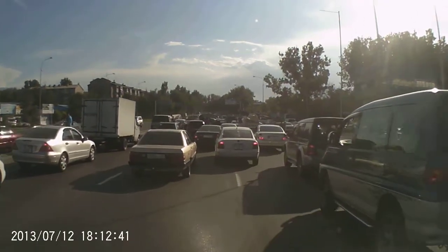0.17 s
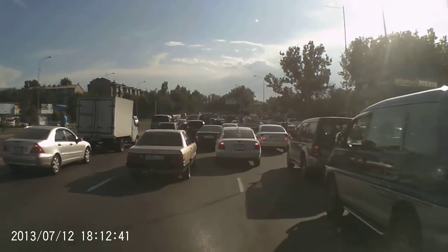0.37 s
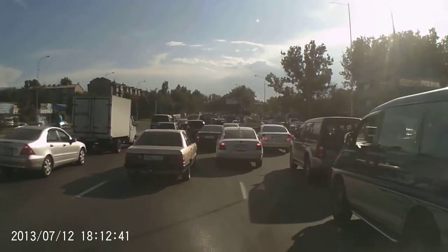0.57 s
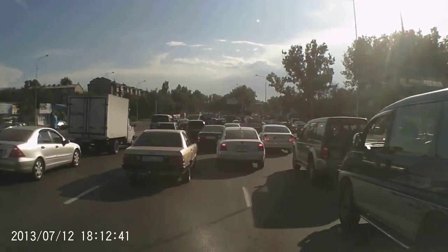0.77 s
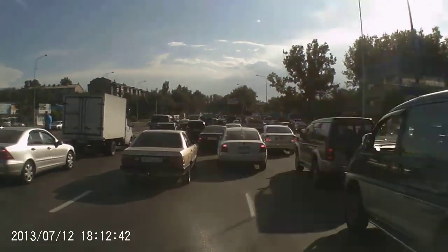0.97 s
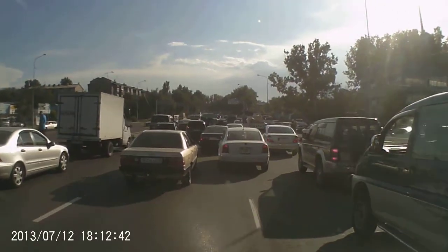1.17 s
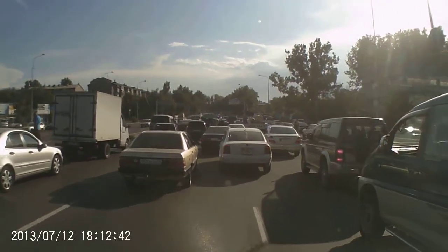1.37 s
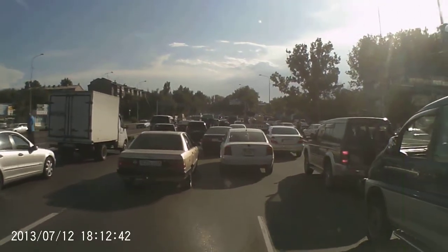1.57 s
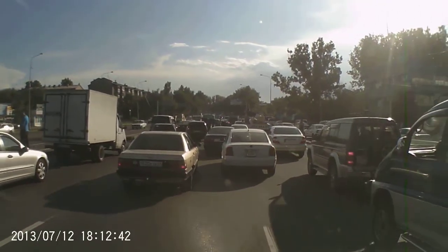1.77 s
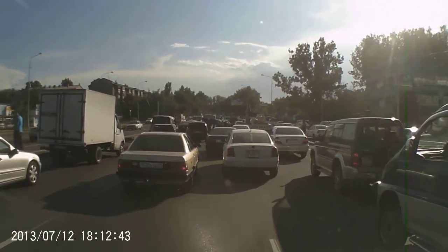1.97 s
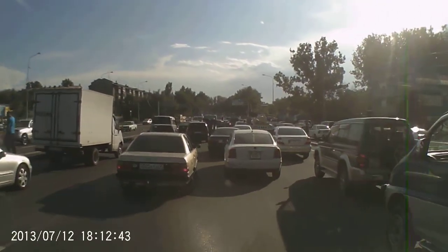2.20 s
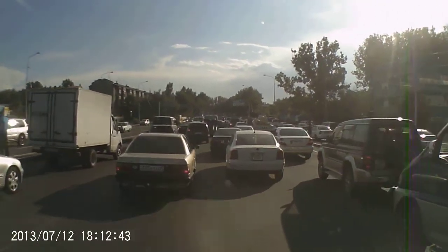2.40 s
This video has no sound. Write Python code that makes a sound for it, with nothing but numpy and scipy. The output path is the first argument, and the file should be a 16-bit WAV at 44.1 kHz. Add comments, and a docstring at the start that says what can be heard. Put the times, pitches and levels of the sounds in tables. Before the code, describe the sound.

Low car-cabin rumble with a slowing engine hum, dull body bumps and faint buzzy electronic hiss

```python
"""The cabin of a car rolling slowly in heavy traffic booms: deep noise held at an even strength.
The engine adds a slowing hum built from sine waves, and bumps thud as short swelling tones.
Road rumble, tyre roar and upper tyre hiss are coloured noise; a panel growls briefly twice.
A dashboard camera's electronics add hiss, buzzy spurts, thin whines, a sizzle, ticks and crackle."""
import sys
import numpy as np
from scipy import signal
from scipy.fft import irfft
from scipy.io import wavfile
from scipy.ndimage import uniform_filter1d

SR = 44100
rng = np.random.default_rng(int(sys.argv[2]) if len(sys.argv) > 2 else 0)


def dump(signal):
    """Clip the signal to [-1, 1] and save it as 16-bit WAV at the path in sys.argv[1]."""
    limited = np.clip(np.atleast_2d(signal).T, -1, 1)
    pcm = np.round(limited * 32767).astype(np.int16)
    wavfile.write(sys.argv[1], SR, pcm)


N = 112014  # length in samples

# Noise colours below give only the balance of pitches; strength is set separately.

# Camera hiss colour: (frequency [Hz], relative level [dB per Hz])
HISS_COLOUR = [(1000, -4), (3000, 0), (4000, 0), (4400, -3), (5350, 0), (5900, -3), (7000, -4),
               (7500, -7.5), (8100, -6), (9700, -12.5), (10800, -12.5), (12200, -9), (13200, -10.5),
               (13800, -16), (15000, -16.5), (15600, -20)]
# Hiss resonances: (centre [Hz], width [Hz], lift [dB])
HISS_RESONANCES = [(5380, 250, 2), (8000, 200, 2), (11100, 250, 2.5), (12050, 220, 3)]
HISS_DB, HISS_BUZZ_DB = -54.5, 1.4  # middle level, and swing up and down at the buzz rate
BUZZ_HZ, BUZZ_DEPTH = 64, .16  # buzz rate; relative depth of the buzz in the spurts
REPEAT_SHARE, REPEAT_ABOVE_HZ = .33, 7500  # echoed share of the treble, and where it begins

# Interference spurts: (start [s], length [s], level against SPURT_DB [dB], treble change [dB])
SPURT_EVENTS = [(0.106, 0.05, -1.5, 1), (0.29, 0.046, -6, 4), (0.349, 0.05, -1.5, -8),
                (0.409, 0.089, 0.5, -7), (0.569, 0.043, -2.5, -3), (0.703, 0.033, -6, -14),
                (0.78, 0.065, -1.5, -1), (.915, 0.042, -4.5, 4), (1.114, 0.055, 1, 0.5),
                (1.32, 0.054, -4, 2), (1.402, .098, -2.5, 0.5), (1.582, 0.041, 0.5, -1),
                (1.781, 0.039, -3, 2), (1.904, 0.0464, -4, 3.5), (1.979, .028, -8, 0), (2.11, .045, -2, 2),
                (2.185, .04, -8, -3), (2.25, 0.04, -3, 1), (2.304, 0.051, -3, 4), (2.413, .08, -0.2, .3)]
# Spurt colour: (frequency [Hz], relative level [dB per Hz])
SPURT_COLOUR = [(1000, -5), (3000, -2), (4400, -6), (5300, 0), (6000, -1), (6800, -1), (7500, -7),
                (8700, -11), (9300, -7), (10800, -12), (12600, -10), (13100, -7), (13700, -14),
                (15600, -17)]
# Spurt resonances: (centre [Hz], width [Hz], lift [dB])
SPURT_RESONANCES = [(6980, 180, 5), (8000, 150, 8), (10420, 180, 8.5), (11250, 260, 4), (12050, 140, 13.5),
                    (13050, 220, 2)]
SPURT_DB, SPURT_REST_DB = -53.2, -26  # base level, and constant fizz relative to it
SPURT_EDGE_S = .005  # ramp time, also used by the whines
BRIGHT_ABOVE_HZ = 8500  # where each spurt's treble change begins
# Pulse rate, relative rate drift, decay time, and height above the steady fizz
PULSE_HZ, PULSE_JITTER, PULSE_DECAY_S, PULSE_HEIGHT = 215, .2, .0004, 1.9

# Thin whines before wavering: (start [s], length [s], frequency [Hz], level [dB])
WHINE_EVENTS = [(-.01, .128, 8909, -62.5), (.135, .045, 8909, -64), (.56, .13, 7187, -71),
                (.965, .09, 8995, -73), (.965, .22, 10900, -76), (1.07, .115, 8995, -68),
                (1.27, .04, 8995, -72)]
# High sizzle colour: (frequency [Hz], relative level [dB per Hz])
SIZZLE_COLOUR = [(3500, -35), (5000, -15), (5400, 0), (5750, -9), (6500, -28)]
# Sizzle strength before drift: (time [s], level [dB])
SIZZLE_STRENGTH = [(0, -70), (1.3, -83), (1.8, -71), (1.86, -61), (1.92, -72), (2.05, -67), (2.54, -73)]
# Tiny ticks: (middle [s], level [dB])
TICK_EVENTS = [(.419, -48), (.439, -48), (.5115, -44), (1.177, -41.5), (1.912, -48)]
TICK_S = .0004  # fade time on each side
CRACKLE_PER_S, CRACKLE_DB = 150, -54

# Upper tyre hiss colour: (frequency [Hz], relative level [dB per Hz])
TYRE_HISS_COLOUR = [(400, 1), (850, -12.5), (1100, -2), (1550, -0.5), (1680, -6), (1900, -6.5), (2300, -15),
                    (3000, -15.5)]
# Tyre hiss strength before gain and drift: (time [s], level [dB])
TYRE_HISS_STRENGTH = [(0, -45.5), (.3, -43.5), (1.08, -43.5), (1.15, -41), (1.2, -45), (1.45, -43.5),
                      (1.6, -46), (2.22, -44.5), (2.27, -39.5), (2.31, -44), (2.35, -40.5), (2.42, -45),
                      (2.455, -40), (2.54, -46.5)]
# Tyre roar colour: (frequency [Hz], relative level [dB per Hz])
TYRE_COLOUR = [(150, -0.5), (400, -3.5), (650, -2.5), (900, -4), (1100, -10), (1500, -11)]
# Tyre roar strength before gain and drift: (time [s], level [dB])
TYRE_STRENGTH = [(0, -38), (.06, -43), (.11, -38.5), (.18, -42), (.9, -43), (.97, -40), (1.06, -41.5),
                 (1.13, -37.5), (1.21, -43.5), (1.5, -45), (1.76, -45), (1.89, -45), (2, -46), (2.27, -42),
                 (2.54, -43)]
TYRE_GAIN_DB, TYRE_HISS_GAIN_DB = 2, -.5
# Road rumble colour: (frequency [Hz], relative level [dB per Hz])
ROAD_COLOUR = [(40, -18), (75, -8.5), (110, -1), (140, -1), (170, -7), (220, -7), (300, -12.5), (400, -17),
               (800, -22), (2000, -99)]
# Rumble strength before drift: (time [s], level [dB])
ROAD_STRENGTH = [(0, -38), (.14, -37), (.21, -45), (.28, -34.5), (.35, -35.5), (.5, -38), (.72, -35),
                 (.98, -41.5), (1.08, -35.5), (1.2, -37), (1.4, -39.5), (1.55, -38.5), (1.75, -38.5),
                 (1.85, -35), (2.03, -38.5), (2.2, -40.5), (2.54, -42)]
# Cabin resonances: (centre [Hz], width [Hz], lift [dB])
CABIN_RESONANCES = [(292, 27, 3), (452, 16, 4.5), (537, 52, 3.5), (702.7, 21, 5.5), (926, 31, 3.5),
                    (1091, 41, 6.5), (1284, 160, 2.5), (1545, 58, 4), (1640, 30, 3), (1752, 44, 5.5),
                    (1940, 42, 3.5)]

# Panel growls before drift: (middle [s], frequency [Hz], level [dB], half length [s])
PANEL_DRONES = [(1.492, 166.6, -27.5, 0.025), (2.362, 163.9, -34, 0.036)]
# Body bumps before bass evening: (start [s], ring frequency [Hz], level [dB], rise [s])
BUMP_EVENTS = [(.13, 45.6, -14, .015), (.297, 33.3, -16, 0.019), (.389, 36.4, -17.5, 0.016),
               (0.497, 33.7, -13.5, 0.014), (0.602, 37.5, -11.5, 0.012), (.705, 48.5, -16, 0.014),
               (.797, 48.3, -15.5, 0.02), (0.876, 49, -19, 0.019), (0.955, 34.6, -15, 0.017),
               (1.17, 40.7, -9.5, .014), (1.424, 47.3, -8, 0.017), (1.54, 43.7, -17, 0.012),
               (1.729, 33.5, -5.5, 0.019), (1.901, 42.4, -18, .014), (2.268, 38.4, -15.5, .015),
               (2.37, 35.6, -14, 0.012)]

# Engine firing rate before wavering: (time [s], rate [Hz])
FIRING_RATE = [(0, 52.83), (.3, 51.9), (.75, 48.19), (1.1, 45.67), (1.5, 43.13), (2.0, 42.3), (2.54, 40.33)]
# Engine tones: (multiple of the firing rate, base level [dB])
ENGINE_TONES = [(1, -24.5), (2, -41), (3, -43.5), (4, -48.5), (6, -50)]
# Level change of the firing hum: (time [s], level [dB])
HUM_CHANGE = [(0, 3), (.11, -6.5), (.18, 11.5), (.24, 7.5), (.28, -9), (.7, -5), (.9, 2), (1.05, -6.5),
              (1.15, -1.5), (1.26, 5), (1.65, 1.5), (1.8, 5), (1.87, -7), (1.95, 4), (2.2, 1), (2.54, -1)]
# Level change of the higher tones before drift: (time [s], level [dB])
OVERTONE_CHANGE = [(0, 3), (.5, 1), (.8, 4.5), (1.15, 7), (1.7, -4.5), (2.54, 2)]

# Cabin boom colour: (frequency [Hz], relative level [dB per Hz])
BOOM_COLOUR = [(10, -30), (18, -15), (23, 0), (28, 4), (42, -3), (56, 2.5), (63, -1), (70, -15), (100, -45)]
# Boom strength relative to BOOM_DB: (time [s], level [dB])
BOOM_CHANGE = [(0, 0.5), (.8, 1), (1.05, -1.5), (1.45, 4.5), (1.75, 2.5), (1.88, -1), (2.05, -1.5),
               (2.54, 2.5)]
BOOM_DB, BOOM_EVEN, BOOM_TOP_HZ = -26, .8, 78  # base level, evenness (0-1), upper edge
# Evenness of all deep bass (0-1), the level it leans towards, upper edge
BASS_EVEN, BASS_KNEE_DB, BASS_TOP_HZ = .33, -20, 75

SKIRT_DB_PER_OCT = 24  # extra fall of each noise above its last colour point
TOP_HZ, FADE_S = 15700, .004  # camera's upper edge; fade at both ends


def undb(db):
    """Turn decibels into a multiplier."""
    return 10 ** (np.asarray(db) / 20)


def unit(x):
    """Scale to an average strength (rms) of 1."""
    return x / np.sqrt(np.mean(x ** 2))


def curve(rows):
    """Join (time, value) rows by straight lines."""
    return np.interp(np.arange(N) / SR, *np.array(rows, float).T)


def noise(colour, peaks=()):
    """Mix all pitches with random phases, shaped by a colour and its resonances."""
    f = np.arange(N // 2 + 1) * SR / N
    hz, db = np.array(colour, float).T
    shape = np.interp(np.log(f + 1), np.log(hz), db)
    shape -= SKIRT_DB_PER_OCT * np.log2(np.maximum(f / hz[-1], 1))
    for centre, width, lift in peaks:
        shape += lift / (1 + (2 * (f - centre) / width) ** 2)
    random_phase = np.exp(2j * np.pi * rng.random(len(f)))
    return unit(irfft(undb(shape) * random_phase, N))


def walk(rate):
    """Drift smoothly between random values, about `rate` per second, with rms 1."""
    k = int(SR / rate)
    steps = np.repeat(rng.standard_normal(256), k)[:N]
    return unit(uniform_filter1d(uniform_filter1d(steps, k), k))


def gate(t, start, length):
    """Switch on for a while, with short ramps."""
    nearest_edge = np.minimum(t - start, start + length - t)
    return np.clip(nearest_edge / SPURT_EDGE_S + .5, 0, 1)


def steep_filter(x, edge_hz, kind):
    """Keep the low or high pitches without shifting them in time."""
    return signal.sosfiltfilt(signal.butter(4, edge_hz, kind, fs=SR, output="sos"), x)


def hiss(t):
    """Camera hiss: coloured noise whose strength drifts and pulses at the buzz rate."""
    buzz_db = HISS_BUZZ_DB * np.cos(2 * np.pi * BUZZ_HZ * t)
    level = undb(HISS_DB + .67 * walk(60.66) + buzz_db)
    return level * noise(HISS_COLOUR, HISS_RESONANCES)


def spurts(t):
    """Interference: buzzing noise spiked by uneven pulses, each burst with its own brightness."""
    cycle = 2 * np.pi * BUZZ_HZ * t
    buzz = 1 + BUZZ_DEPTH * (np.cos(cycle) + .5 * np.cos(2 * cycle))
    pulse_count = np.cumsum(PULSE_HZ * (1 + PULSE_JITTER * walk(70))) / SR
    since_pulse = pulse_count % 1 / PULSE_HZ
    pulses = 1 + PULSE_HEIGHT * np.exp(-since_pulse / PULSE_DECAY_S)
    fizz = unit(buzz * pulses) * noise(SPURT_COLOUR, SPURT_RESONANCES)
    treble = steep_filter(fizz, BRIGHT_ABOVE_HZ, "high")
    out = undb(SPURT_REST_DB) * fizz
    for start, length, db, bright_db in SPURT_EVENTS:
        burst = fizz + (undb(bright_db) - 1) * treble
        out += undb(db) * gate(t, start, length) * burst
    return undb(SPURT_DB) * out


def repeat_treble(x):
    """Add part of the treble again one buzz period later."""
    sos = signal.butter(2, REPEAT_ABOVE_HZ, "high", fs=SR, output="sos")
    return x + REPEAT_SHARE * np.roll(signal.sosfilt(sos, x), int(SR / BUZZ_HZ))


def whines(t):
    """Thin sine tones that come and go, wavering in pitch and level."""
    waver = np.cumsum(12 * walk(50.7)) / SR  # pitch drift with rms 12 Hz
    out = np.zeros(N)
    for start, length, hz, db in WHINE_EVENTS:
        out += undb(db) * gate(t, start, length) * np.sin(2 * np.pi * (hz * t + waver))
    return out * undb(1.5 * walk(60))


def sizzle():
    """A faint band of high noise, strongest late on."""
    return undb(curve(SIZZLE_STRENGTH) + 2 * walk(37.5)) * noise(SIZZLE_COLOUR)


def ticks(t):
    """Tiny puffs of noise that rise and fade very fast."""
    strength = sum(undb(db) * np.exp(-np.abs(t - middle) / TICK_S) for middle, db in TICK_EVENTS)
    return strength * rng.standard_normal(N)


def crackle():
    """Single-sample clicks at random moments and strengths."""
    hits = rng.random(N) < CRACKLE_PER_S / SR
    return undb(CRACKLE_DB) * hits * rng.standard_normal(N)


def electronics(t):
    """All the camera's own noises, which reach the sound without the cabin's colour."""
    return repeat_treble(hiss(t) + spurts(t)) + whines(t) + sizzle() + ticks(t) + crackle()


def tyre_hiss():
    """Upper tyre hiss: a brighter wash of noise coloured by the cabin."""
    level = undb(TYRE_HISS_GAIN_DB + curve(TYRE_HISS_STRENGTH) + .34 * walk(57.6))
    return noise(TYRE_HISS_COLOUR, CABIN_RESONANCES) * level


def tyre_roar():
    """Tyre roar through the glass: dull noise coloured by the cabin."""
    level = undb(TYRE_GAIN_DB + curve(TYRE_STRENGTH) + 1.44 * walk(61.5))
    return noise(TYRE_COLOUR, CABIN_RESONANCES) * level


def drones(t):
    """A panel swells into short, unsteady growls: sine tones with a rounded rise and fall."""
    out = np.zeros(N)
    for middle, hz, db, half_s in PANEL_DRONES:
        swell = np.exp(-((t - middle) / half_s) ** 2)
        out += undb(db) * swell * np.sin(2 * np.pi * hz * t)
    return out * undb(2.2 * walk(49.85))


def road():
    """Road rumble through the body: low noise coloured by the cabin."""
    level = undb(curve(ROAD_STRENGTH) + walk(45.3))
    return noise(ROAD_COLOUR, CABIN_RESONANCES) * level


def bumps(t):
    """Body bumps: low tones that swell and die within a few swings."""
    out = np.zeros(N)
    for start, hz, db, rise_s in BUMP_EVENTS:
        age = np.maximum(t - start, 0)
        rise = age / rise_s
        swell = (rise * np.exp(1 - rise)) ** 2
        out += undb(db) * swell * np.sin(2 * np.pi * hz * age)
    return out


def engine():
    """The slowing firing hum and tones at its multiples, each wavering a little."""
    firing_hz = curve(FIRING_RATE) * (1 + .01243 * walk(12.57))
    phase = 2 * np.pi * np.cumsum(firing_hz) / SR
    hum = undb(curve(HUM_CHANGE))
    overtones = undb(curve(OVERTONE_CHANGE) + 2.25 * walk(25.4))
    out = np.zeros(N)
    for multiple, db in ENGINE_TONES:
        level = undb(db + 1.5 * walk(20)) * (overtones if multiple > 1 else hum)
        out += level * np.sin(multiple * phase + 2 * np.pi * rng.random())
    return out


def cabin_boom():
    """Deep cabin noise, divided by most of its own swelling so that it stays even."""
    boom = signal.hilbert(noise(BOOM_COLOUR))  # its size is the momentary strength
    even = boom.real / (np.abs(boom) ** 2 + .5) ** (BOOM_EVEN / 2)
    even = unit(steep_filter(even, BOOM_TOP_HZ, "low"))
    return undb(BOOM_DB + curve(BOOM_CHANGE)) * even


def even_bass(x):
    """Partly level out swells and gaps in the deep bass, leaving the rest unchanged."""
    bass = signal.hilbert(steep_filter(x, BASS_TOP_HZ, "low"))
    strength = np.abs(bass) / undb(BASS_KNEE_DB)
    gain = (.8 * strength ** 2 + .2) ** (-BASS_EVEN / 2)  # the .2 limits the lift in gaps
    return x + steep_filter((gain - 1) * bass.real, BASS_TOP_HZ, "low")


def scene():
    """Everything as it reaches the camera, plus the camera's own noises."""
    t = np.arange(N) / SR
    tyres = tyre_hiss() + tyre_roar()
    car = road() + bumps(t) + engine() + cabin_boom()
    return (electronics(t) + drones(t) + even_bass(tyres + car))[None]


def record(dry):
    """The camera cuts the top steeply; short fades open and close the sound without a click."""
    t = np.arange(N) / SR
    ends = np.clip(np.minimum(t, t[-1] - t) / FADE_S, 0, 1)
    sos = signal.ellip(10, .2, 80, TOP_HZ, fs=SR, output="sos")  # .2 dB ripple, 80 dB cut
    return signal.sosfilt(sos, dry * ends)


dry = scene()
out = record(dry)
dump(out)
```